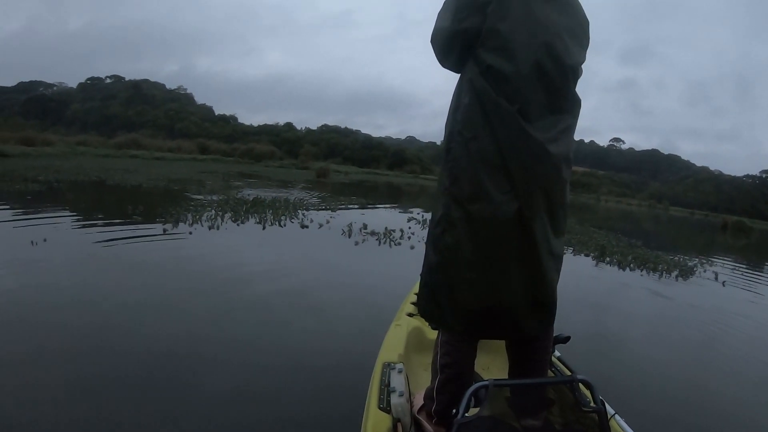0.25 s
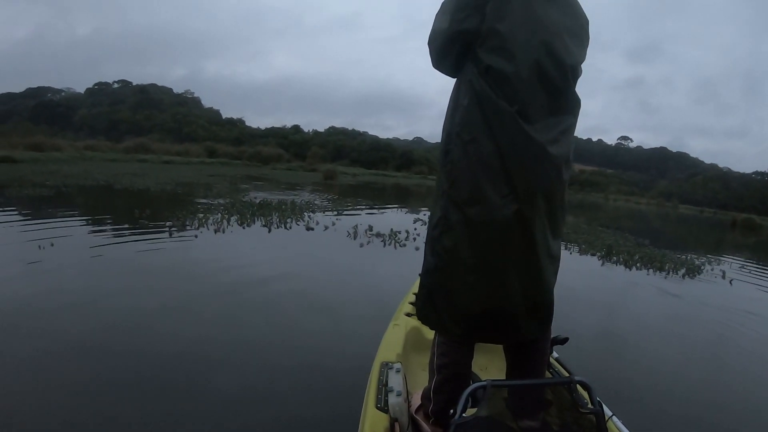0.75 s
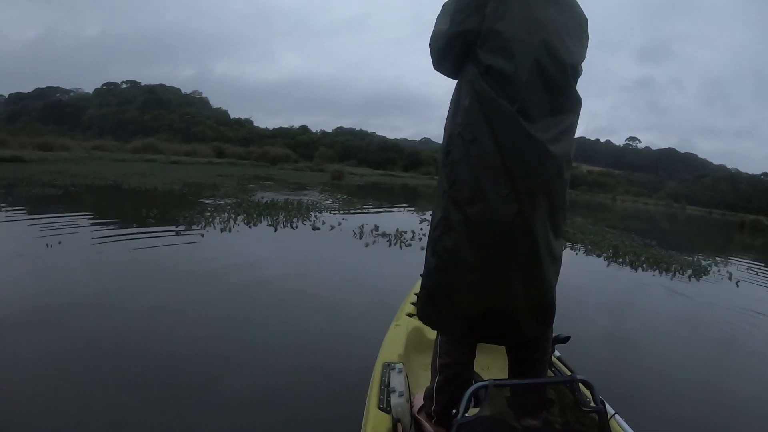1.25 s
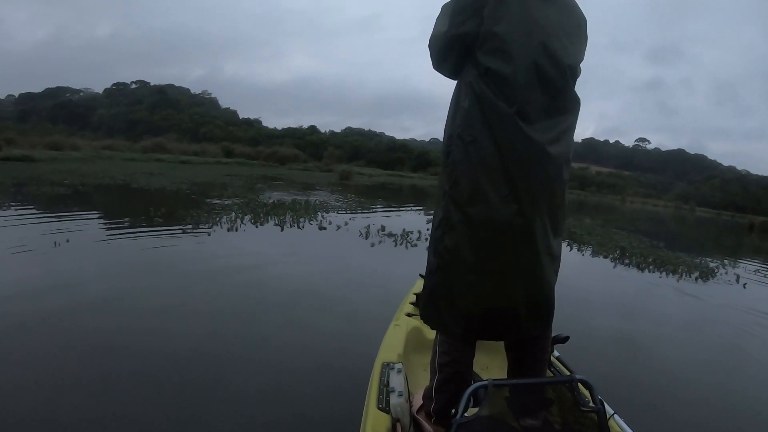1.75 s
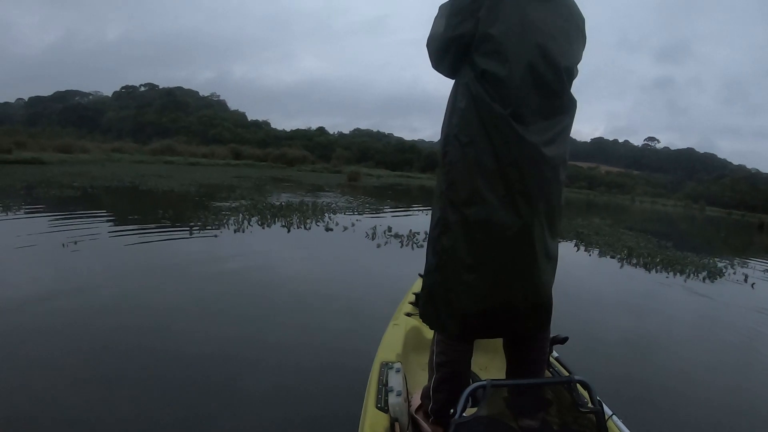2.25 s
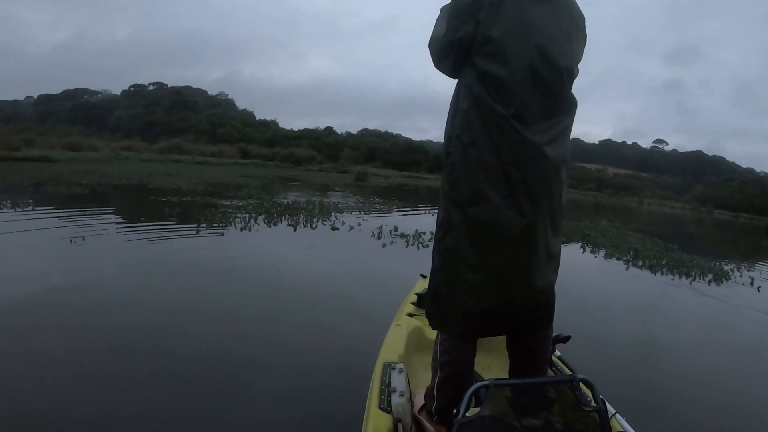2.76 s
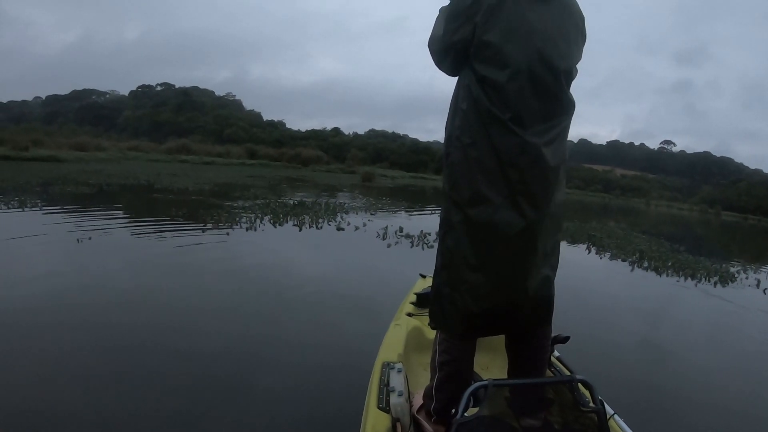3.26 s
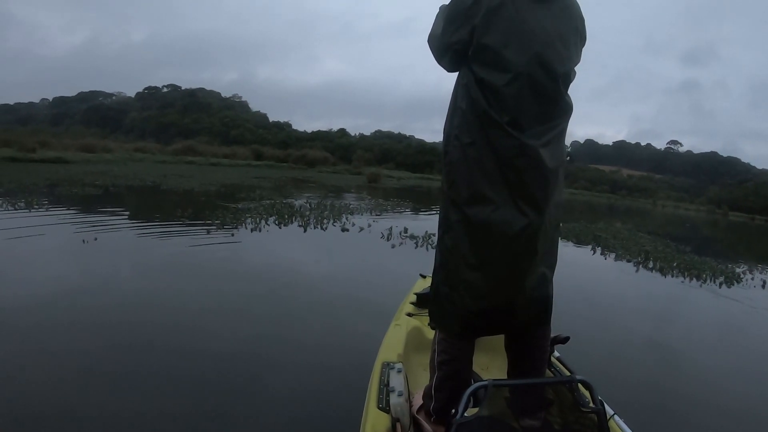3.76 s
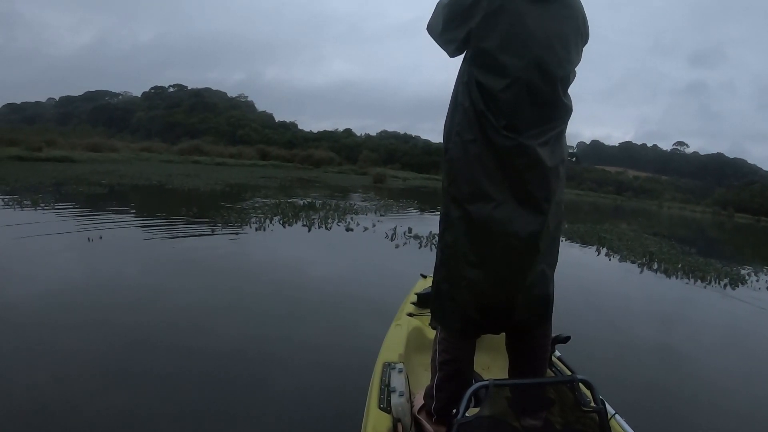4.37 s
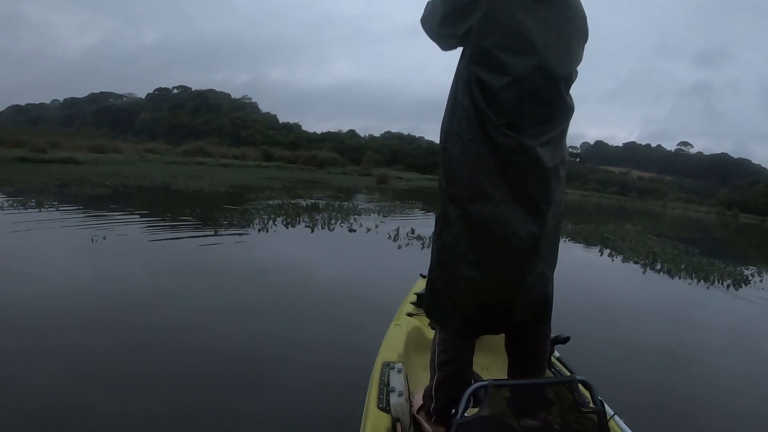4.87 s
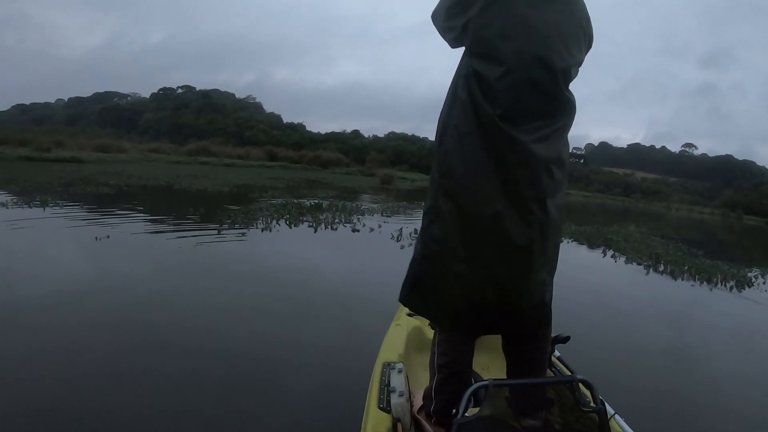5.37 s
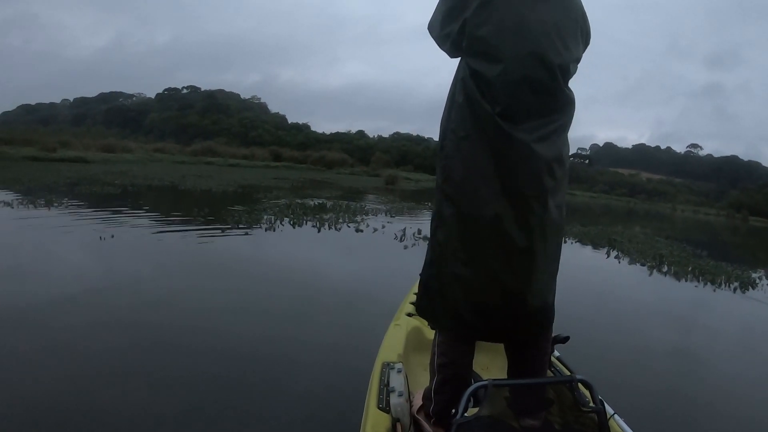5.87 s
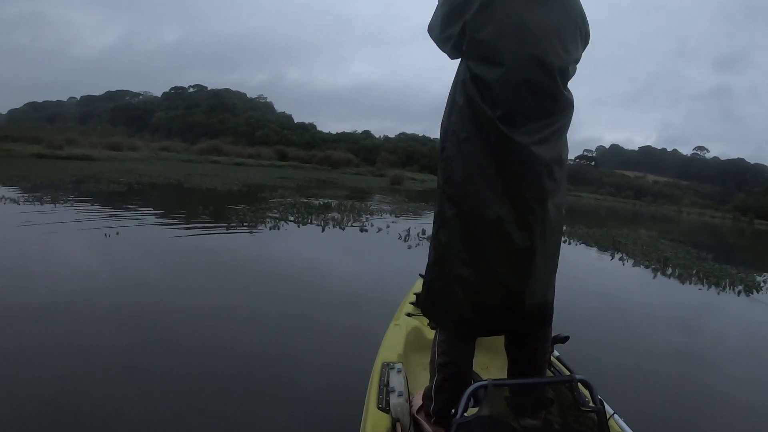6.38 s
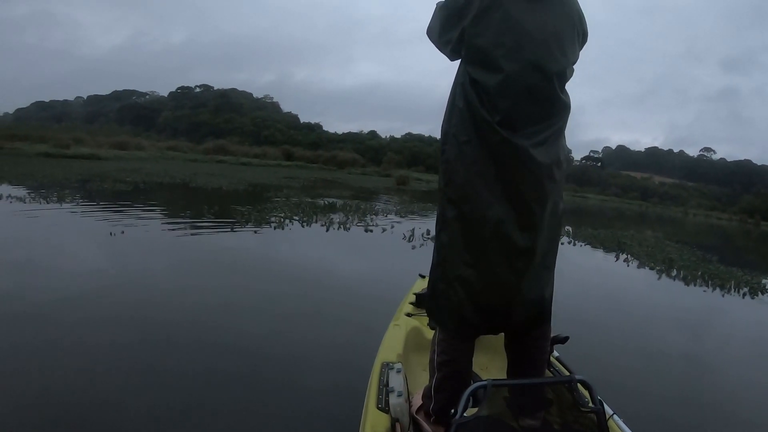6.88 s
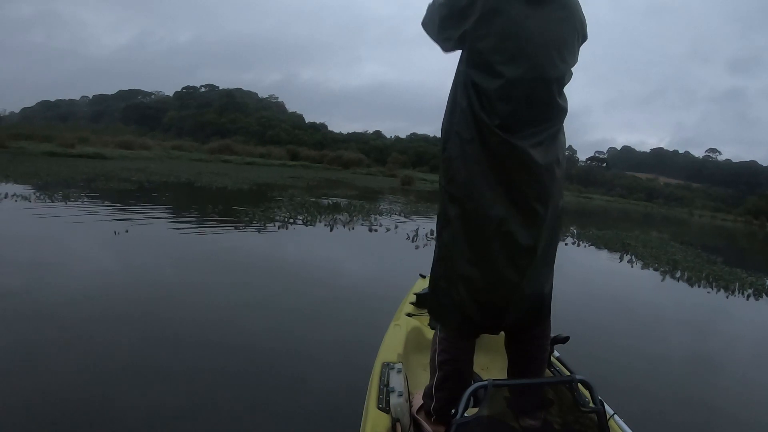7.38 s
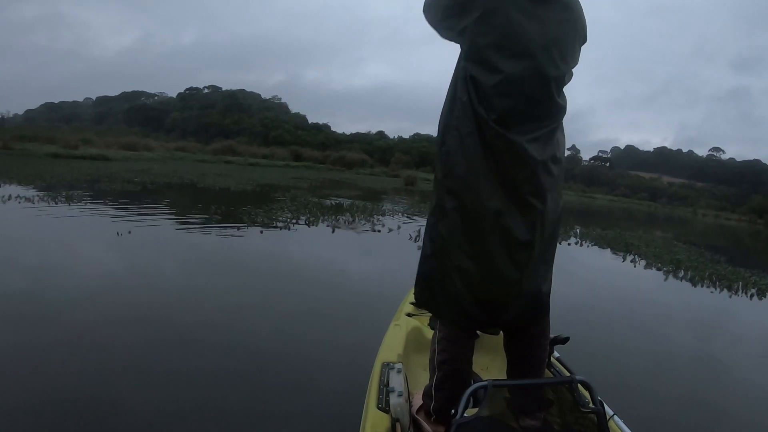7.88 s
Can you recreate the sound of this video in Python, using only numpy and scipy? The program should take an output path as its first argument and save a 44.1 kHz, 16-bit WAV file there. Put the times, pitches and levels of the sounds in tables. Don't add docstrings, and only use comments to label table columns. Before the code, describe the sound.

Many birds chirp and slur from both banks as bursts of fish splashing break out beside a kayak, over a soft low hum.

```python
import sys
import numpy as np
from scipy import signal
from scipy.fft import rfft, irfft
from scipy.io import wavfile
from scipy.ndimage import uniform_filter1d

SR = 44100
rng = np.random.default_rng(int(sys.argv[2]) if len(sys.argv) > 2 else 0)


def field_ratio(decibels):
    return 10 ** (np.asarray(decibels, dtype=float) / 20)


def store_wav(level_fs):
    pcm = np.round(np.clip(np.atleast_2d(level_fs), -1, 1) * 32767)
    wavfile.write(sys.argv[1], SR, pcm.T.astype(np.int16))


N = 358533


def rms_one(x):
    return x / np.sqrt(np.mean(x ** 2) + 1e-20)


def at_hz(points, hz):
    points = np.array(points)
    return np.interp(np.log(hz), np.log(points[:, 0]), points[:, 1])


def drift(rate):
    return np.interp(np.arange(N) * rate / SR, np.arange(3000), rng.standard_normal(3000))


def colour(x, spectrum):
    hz = np.fft.rfftfreq(N + 1, 1 / SR) + 1
    inside = (hz > spectrum[0][0]) & (hz < spectrum[-1][0])
    gain = field_ratio(at_hz(spectrum, hz)) * inside
    return irfft(rfft(x, N + 1) * gain, N + 1)[..., :N]


def spread(mid, side):
    # (frequency [Hz], likeness [0 to 1])
    likeness = [(30, .3), (70, 0.3), (160, 0.75), (300, 0.35), (1050, 0.65), (2730, 0.65), (7100, 0.15)]
    hz = np.fft.rfftfreq(N + 1, 1 / SR) + 1
    alike = np.clip(at_hz(likeness, hz), .1, 1)
    common = rfft(mid, N + 1) * np.sqrt(1 + alike)
    opposed = rfft(side, N + 1) * np.sqrt(1 - alike)
    return irfft(np.array([common + opposed, common - opposed]), N + 1)[:, :N] / np.sqrt(2)


def add(out, start, hz, height):
    i = int(start * SR)
    tone = height * np.sin(2 * np.pi * np.cumsum(hz) / SR)
    tone = tone[max(-i, 0):max(N - i, 0)]
    out[max(i, 0):max(i, 0) + len(tone)] += tone


def notes(rows, edge):
    out = np.zeros(N)
    for start, length, first, middle, last, level_db in rows:
        u = np.linspace(0, 1, int(length * SR))
        bend = np.polyfit([0, .5, 1], np.log([first, middle, last]), 2)
        swell = np.sin(np.pi * u) ** edge
        add(out, start, np.exp(np.polyval(bend, u)), np.sqrt(2) * field_ratio(level_db) * swell)
    return out


def glides(rows, bend):
    return [(s, length, a, a * (b / a) ** bend, b, level_db) for s, length, a, b, level_db in rows]


def songs(phrases):
    out = np.zeros(N)
    for phrase in phrases:
        s, hz, level_db = np.transpose(phrase)
        t = np.arange(s[0], s[-1], 1 / SR)
        pitch = uniform_filter1d(np.interp(t, s, np.log(hz)), size=900, mode="nearest")
        ends = np.clip(np.minimum(t - s[0] + .001, s[-1] - t) / 0.0027, 0, 1)
        add(out, s[0], np.exp(pitch), np.sqrt(2) * field_ratio(np.interp(t, s, level_db)) * ends)
    return out


def banks(x, t60):
    t = np.arange(SR // 2) / SR
    tails = rng.standard_normal((2, len(t))) * field_ratio(-60 * t / t60) * (t > .004)
    tails = tails / np.sqrt(np.sum(tails ** 2, axis=1, keepdims=True))
    return signal.fftconvolve(x[None], tails, axes=1)[:, :N]


def bubble(rows, cycles, rise):
    out = np.zeros(N)
    for start, peak_db, hz in rows:
        u = np.linspace(0, 1, int(cycles / hz * SR))
        swell = (5 * u * np.exp(1 - 5 * u)) ** 2
        add(out, start, hz * (1 - rise / 4 + rise * u), field_ratio(peak_db) * swell)
    return out


def lead_singer():
    # (time into the syllable [s], pitch [Hz], level [dB])
    syllables = [
        [(0, 3560, -14.5), (.02, 3680, -7), (.09, 3760, -6), (.11, 3730, -16)],
        [(0, 3200, -16.5), (.03, 3710, -3), (.08, 4110, -1.5), (.155, 4350, -2), (.175, 4330, -18.5)],
        [(.012, 5800, -24), (.02, 5560, -6), (.058, 4790, 1), (.12, 3620, -3), (.17, 3220, -10),
         (.26, 2900, -14)],
        [(0, 6860, -20), (.046, 5100, -0.5), (.085, 4150, 1), (.124, 3600, -5), (.17, 3230, -14),
         (.25, 2940, -20)],
    ]
    # (start of each syllable in order [s] .., level [dB])
    sung = [
        (0.444, .71, 0.96, 1.363, -42),
        (2.415, 2.668, 2.885, -52),
        (5.536, 5.815, 6.066, 6.463, -41),
        (7.76, 8.0, -52),
    ]
    phrases = []
    for *starts, level_db in sung:
        for s, syllable in zip(starts, syllables):
            phrases.append(np.add(syllable, [s, 0, level_db]))
    return songs(phrases)


def slurring_birds():
    # (time [s], length [s], first [Hz], last [Hz], level [dB])
    falls = [(.579, 0.19, 3245, 2137, -53.5), (.593, .11, 2680, 2060, -55.5),
             (.808, .05, 3700, 2375, -54.5), (1.285, .135, 2480, 2050, -52),
             (1.417, .052, 3680, 3420, -52.5), (2.885, 0.225, 3330, 2050, -52.5),
             (3.665, .08, 2650, 2250, -57), (3.7, .11, 5150, 3530, -55.5), (4.495, .1, 4550, 3000, -60),
             (5.13, .25, 3430, 2580, -55), (6.235, .13, 4990, 3040, -56.5), (6.75, .12, 5900, 3800, -57),
             (7.54, 0.2, 5810, 3050, -59), (7.565, 0.047, 3800, 3370, -51)]
    droops = [
        (1.742, .055, 3450, 2250, -57.5),
        (1.77, .145, 3750, 2200, -56.5),
        (4.224, .11, 3580, 2300, -59),
        (7.465, .076, 3600, 2750, -57),
        (1.177, .115, 3790, 2450, -51),
    ]
    dives = [
        (.786, .085, 7900, 5350, -67),
        (3.011, .075, 6900, 5300, -63),
        (5.31, .09, 7900, 5400, -67),
        (4.67, .075, 6550, 5700, -63),
        (.71, .05, 7000, 5300, -65),
    ]
    climbs = [(.86, .07, 2700, 3440, -58.5), (3.215, .075, 2500, 3400, -57), (3.51, .07, 3150, 3610, -54),
              (4.915, .045, 3800, 4300, -58.5), (5.25, .055, 3100, 3880, -54),
              (6.627, .08, 3740, 4270, -58.5), (4.047, .09, 4930, 5450, -64.5)]
    catches = [.627, .712, 2.94, 2.998, 3.058, 5.208, 5.247]
    catch_s, catch_depth = .008, .95
    rows = glides(falls, .62) + glides(droops, .4) + glides(dives, .8) + glides(climbs, .75)
    t = np.arange(N) / SR
    caught = sum(np.exp(-((t - s) / catch_s) ** 2) for s in catches)
    return notes(rows, edge=0.23) * (1 - catch_depth * caught)


def chatterer():
    # (time [s], length [s], foot [Hz], top [Hz], level [dB])
    arches = [(4.455, .078, 2250, 2880, -56), (4.743, .088, 2350, 3080, -46),
              (4.862, .035, 2950, 3550, -55), (7.614, .04, 2310, 2750, -49),
              (7.655, 0.049, 2294, 2800, -48.5), (8.0, 0.06, 2050, 2600, -45), (.19, .07, 2350, 2800, -59)]
    # (time [s], length [s], first [Hz], last [Hz], level [dB])
    strokes = [(4.652, .036, 2450, 3800, -53), (4.687, .018, 3800, 2700, -54),
               (4.83, .055, 2900, 2420, -49), (4.888, .062, 2850, 2380, -45), (4.955, .04, 2350, 2750, -49),
               (4.995, .042, 2650, 2320, -52), (4.54, .04, 2600, 2200, -58), (4.685, .025, 2300, 2500, -53),
               (7.755, .085, 2680, 2250, -46), (7.732, .028, 2250, 2700, -48)]
    rows = [(s, length, foot, top, foot, level_db) for s, length, foot, top, level_db in arches]
    return notes(rows + glides(strokes, .55), edge=0.22)


def trill():
    starts = [4.262, 4.345, 4.437, 4.52, 4.6, 4.76, 4.83, 4.895, 4.955, 5.01]
    # (length [s], first [Hz], middle [Hz], last [Hz], level [dB])
    length, first, middle, last, level_db = (.032, 6200, 6500, 6720, -61)
    sag_per_s = .09
    rows = []
    for s in starts:
        sag = sag_per_s * (s - starts[0])
        rows.append((s, length, first, middle * (1 - sag / 2), last * (1 - sag), level_db))
    return notes(rows, edge=0.18)


def right_bank_songs():
    # (time [s], pitch [Hz], level [dB])
    phrases = [
        [(0, 2860, -45), (0.07, 2400, -50), (0.138, 2050, -57)],
        [(0.075, 7600, -74), (0.125, 6000, -64), (0.18, 4700, -64)],
        [(0.2, 4850, -64), (0.25, 3950, -57), (0.31, 3400, -57), (0.41, 3430, -58), (0.45, 3550, -60)],
        [(3.275, 7600, -69), (3.345, 5700, -60), (3.4, 4550, -58), (3.45, 3800, -57), (3.495, 3300, -58)],
        [(6.298, 5240, -66), (6.34, 6050, -60), (6.4, 6250, -62), (6.477, 6100, -63)],
        [(6.89, 3280, -60), (6.94, 3950, -57), (6.985, 4280, -56), (7.02, 3850, -61)],
        [(7.12, 5520, -62), (7.15, 5620, -58), (7.2, 5350, -58), (7.254, 4680, -55), (7.329, 3430, -57),
         (7.375, 3400, -54)],
    ]
    return songs(phrases)


def chips():
    # (time [s], length [s], top [Hz], level [dB])
    calls = [(1.356, .04, 5770, -57), (1.697, .13, 6090, -59), (1.838, .038, 6250, -57.5),
             (1.89, .06, 5950, -60), (1.3, .04, 5750, -60), (2.285, .035, 6250, -58),
             (2.49, .045, 7000, -62), (2.71, .08, 7150, -63), (6.92, .04, 5900, -59), (7.0, .03, 5450, -59),
             (7.265, .03, 6200, -59), (2.154, .1, 6540, -56), (2.596, .045, 6320, -58),
             (4.139, 0.05, 5610, -58), (4.21, .04, 5700, -58), (5.787, .1, 5460, -58),
             (5.898, .05, 5704, -55), (5.956, .04, 5860, -57.5), (6.726, .11, 6750, -61),
             (6.866, .038, 6150, -57), (7.059, .03, 5450, -58.5), (7.09, .05, 6850, -63),
             (7.191, .08, 6270, -61.5), (7.311, .055, 7030, -61.5), (7.896, .075, 5250, -60.5),
             (7.985, .04, 5850, -62), (8.044, .04, 5660, -64.5)]
    leap, leap_s, sag_per_s = .16, .011, .25
    out = np.zeros(N)
    for s, length, top, level_db in calls:
        t = np.arange(int(length * SR)) / SR
        hz = top * (1 - leap * np.exp(-t / leap_s) - sag_per_s * t)
        add(out, s, hz, field_ratio(level_db + 3.5) * np.sin(np.pi * t / length) ** 0.23)
    return out


def distant_birds():
    # (time [s], length [s], first [Hz], last [Hz], level [dB])
    far_slides = [(.25, .108, 7500, 4650, -65), (.348, .032, 5750, 5550, -62), (.62, .045, 5850, 5600, -63),
                  (.65, .028, 5000, 5050, -62), (.738, .065, 5200, 5000, -58), (1.1, .12, 5650, 5900, -64),
                  (1.195, .06, 4900, 5600, -62), (1.22, .05, 6050, 5600, -64), (1.29, .045, 5000, 4850, -57),
                  (1.31, .048, 2900, 3950, -55), (1.355, .035, 3250, 2800, -57), (1.535, .075, 5300, 3400, -62),
                  (1.85, .065, 4550, 2950, -59), (2.015, .03, 4350, 4400, -55), (2.045, .025, 6800, 5000, -63),
                  (2.625, .018, 3200, 4200, -53), (2.968, .07, 3520, 3430, -54), (3.25, .075, 5350, 4350, -63),
                  (3.32, .03, 7050, 5700, -63), (3.805, .04, 6750, 6700, -61), (3.955, .065, 7300, 5500, -66),
                  (4.225, .062, 5050, 4950, -60), (4.33, .065, 7500, 7200, -68), (4.775, .07, 4150, 3050, -58),
                  (5.075, .035, 6850, 5950, -59), (5.26, .025, 7100, 5500, -62),
                  (5.575, .045, 3000, 3600, -58), (5.615, .12, 5950, 6900, -63), (5.965, .07, 4950, 4850, -56),
            (6.0, .065, 2850, 3050, -58), (6.195, .045, 4300, 5250, -59), (6.25, .06, 3050, 2850, -57),
            (6.7, .038, 3800, 4400, -55), (6.99, .06, 3050, 2500, -57), (7.05, .04, 2600, 3300, -60),
            (7.2, .06, 2700, 3800, -56), (7.75, .06, 3400, 3900, -58), (7.785, .068, 3300, 3720, -57),
            (7.79, .04, 5800, 5550, -60), (7.83, .04, 5650, 6250, -61), (7.44, .04, 3900, 4000, -56),]
    return notes(glides(far_slides, .55), edge=0.3) * field_ratio(3.5 * drift(110) - .4)


def birds():
    husk = .72 + .6 * drift(320)
    flutter = drift(55)
    left = lead_singer() * field_ratio(1.5 * flutter) + slurring_birds() * field_ratio(3.3 + 1.8 * flutter)
    left = left + chatterer() * husk * field_ratio(1.5)
    right = (right_bank_songs() + chips()) * field_ratio(3.0 * drift(60)) + trill() * husk
    distant = distant_birds()
    left_db = 2.2 - .33 * np.arange(N) / SR
    near = left * field_ratio(np.outer([1, -1], left_db)) + right * field_ratio([[-2.6], [2.2]])
    echoes = field_ratio(-8.5) * banks(left + right + distant, t60=0.21)
    return near + echoes + distant * field_ratio(np.outer([1, -1], 3.0 * drift(4)))


def surges(fade, spray=False):
    # (time [s], hold [s], churned water level [dB], spray level [dB])
    thrashes = [(1.279, .3, -57, -90), (1.606, .12, -55, -85), (1.778, .08, -59, -78),
                (1.965, 0.11, -54.5, -75), (2.087, 0.094, -49.5, -67.5), (2.223, .14, -53, -72.5),
                (2.517, 0.088, -51, -69.5), (2.641, .06, -51, -67.5), (2.76, .13, -55, -81),
                (3.478, 0.04, -50.5, -66), (3.575, .1, -53.5, -70), (3.741, 0.16, -50, -74.5),
                (4.0, .06, -59, -76.5), (4.167, .06, -55.5, -75), (4.297, 0.068, -58.5, -85),
                (4.44, .22, -66, -72), (5.567, 0.22, -59, -79), (5.918, .06, -54.5, -76),
                (6.098, .15, -58, -83), (6.301, .1, -56.5, -80), (6.45, .06, -52, -70.5),
                (6.56, 0.053, -52.5, -77), (6.717, .08, -59, -81), (6.828, .08, -55.5, -69.5),
                (6.964, .04, -61, -80), (7.36, .14, -63, -75), (7.601, .1, -52.5, -77),
                (7.784, .14, -58, -75.5)]
    s, hold, churn_db, spray_db = np.transpose(thrashes)[:, :, None]
    if spray:
        hold = hold * .6
    level_db = spray_db if spray else churn_db
    t = np.arange(0, N, 32) / SR
    rise_db = 450 * np.maximum(s - t, 0)
    fade_db = fade * np.maximum(t - s - hold, 0)
    power = np.sum(field_ratio(level_db - rise_db - fade_db) ** 2, axis=0)
    return np.interp(np.arange(N) / SR, t, np.sqrt(power))


def small_bubbles():
    d = rng.random((2200, 3))
    level_db = -24 * d[:, 1] - 12 * (1 - d[:, 2]) ** 2
    return bubble(np.column_stack([d[:, 0] * N / SR, level_db, 540 * 7.5 ** d[:, 2]]), cycles=9, rise=.5)


def splash():
    # (frequency [Hz], density [dB per Hz])
    churn = [(250, -15), (450, -22.5), (800, -5), (1500, 3.5), (2500, -4), (4000, -2), (7000, -25.5)]
    # (frequency [Hz], density [dB per Hz])
    spray = [(2500, -20), (4500, -17), (7000, -15), (8300, -32), (9300, -24.5), (11500, -43), (14000, -58),
             (15500, -76)]
    small = np.array([small_bubbles(), small_bubbles()])
    lumps = field_ratio(4.3 * drift(35) + 2.2 * drift(140))
    foam = rms_one(colour(rng.standard_normal((2, N)), churn) * lumps)
    water = spread(*(foam + field_ratio(-2.0) * rms_one(small))) * surges(fade=169) * field_ratio(0.5)
    drops = rng.standard_normal((2, N)) * field_ratio(2.6 * rng.exponential(1, N).clip(0, 5))
    drops = drops * (rng.random(N) < .2)
    mist = rms_one(spread(*colour(drops, spray))) * np.sqrt(lumps)
    return water * field_ratio([[.5], [-.5]]) + field_ratio(16.8) * surges(fade=150, spray=True) * mist


def tail_blows():
    # (time [s], peak level [dB], frequency [Hz])
    blows = np.array([(1.651, -38, 700), (1.665, -34.5, 965), (1.7, -39, 1560), (2.106, -31.5, 752),
                      (2.547, -34, 1505), (2.583, -35, 1110), (2.642, -25.5, 1280), (3.491, -31.5, 2240),
                      (3.491, -26, 1350), (3.528, -39, 760), (3.626, -32.5, 723), (3.745, -21.5, 2330),
                      (3.748, -26, 1600), (3.855, -35.5, 1310), (3.883, -29, 1570), (3.906, -35, 770),
                      (4.034, -40.5, 1600), (5.589, -32, 2560), (6.141, -38.5, 2450), (6.224, -37.5, 1300),
                      (6.443, -37.5, 960), (6.977, -38, 2640), (7.618, -24.5, 2380), (7.623, -37.5, 2750),
                      (7.813, -36.5, 2330)])
    # (time [s], peak level [dB])
    ticks = np.array([(2.0346, -39), (2.2754, -36), (2.6803, -33), (3.4803, -31), (3.8078, -34),
                      (4.1946, -35), (7.343, -31), (7.608, -31), (5.737, -40), (6.241, -36)])
    after = []
    for _ in range(5):
        d = rng.random((len(blows), 3))
        later = np.column_stack([0.003 + .016 * d[:, 0], -10 - 13.0 * d[:, 1], 750 * 4.1 ** d[:, 2]])
        after.append(blows * [1, 1, 0] + later)
    pockets = field_ratio(-2.5) * bubble(np.vstack([blows, *after]), cycles=12.0, rise=0.2)
    clicks = np.zeros(N)
    clicks[(blows[:, 0] * SR).astype(int)] = field_ratio(blows[:, 1] - 9.5)
    clicks[(ticks[:, 0] * SR).astype(int)] = field_ratio(ticks[:, 1] + 3.5)
    fading = signal.lfilter([1], [1, -np.exp(-1 / (0.0042 * SR))], clicks)
    band = signal.butter(4, [1100, 4800], "band", fs=SR, output="sos")
    return pockets + signal.sosfilt(band, fading * rng.standard_normal(N))


def lone_bubbles():
    # (time [s], peak level [dB], frequency [Hz])
    blips = [(1.294, -44, 1020), (1.416, -41, 1540), (1.454, -42, 657), (1.609, -40, 1250),
             (1.946, -42, 751), (2.023, -40, 1640), (2.337, -40, 1050), (2.597, -36, 834),
             (2.692, -40, 1010), (3.641, -34, 1000), (3.751, -29, 856), (4.217, -41, 1280),
             (5.59, -40, 837), (5.611, -42, 832), (5.952, -40, 1600), (5.989, -41, 764), (6.601, -38, 1710),
             (6.99, -40, 1520), (7.625, -36, 1390)]
    drips = [(2.834, -33, 4520), (3.1887, -38, 3720), (6.3145, -35, 2960), (6.4028, -34, 3430),
             (6.4842, -36, 2570), (6.8374, -35, 4390), (6.8957, -35, 3390), (7.3427, -26, 3500),
             (7.5068, -31, 3160), (7.7094, -39, 2380)]
    return field_ratio(-2.5) * bubble(blips, cycles=11.0, rise=0.25) + field_ratio(-0.5) * bubble(drips, cycles=16.0, rise=0.15)


def plops():
    # (time [s], length [s], first [Hz], last [Hz], level [dB])
    cavities = [(2.65, 0.014, 293, 415, -51), (3.62, 0.02, 286, 600, -54.5), (3.752, 0.018, 430, 600, -48),
                (3.805, 0.028, 240, 290, -46.5), (3.905, .05, 290, 240, -56), (2.34, .02, 250, 480, -57),
                (2.03, .018, 400, 520, -55), (1.54, .02, 420, 520, -57), (4.235, 0.064, 158, 348, -45),
                (7.628, .03, 695, 840, -48.5), (7.61, 0.017, 294, 348, -53), (7.895, 0.055, 155, 602, -51)]
    return notes(glides(cavities, 0.51), edge=0.29)


def slaps():
    out = tail_blows() + lone_bubbles() + plops()
    return out * field_ratio([[.7], [-.7]]) + field_ratio(-14) * banks(out, t60=0.042)


def sparks():
    # (time [s], peak level [dB])
    droplets = np.array([(2.1251, -54), (2.2498, -64), (2.6778, -52), (3.5069, -47), (3.7125, -60),
                         (3.8087, -60), (3.8866, -60), (4.0462, -60), (5.5902, -61), (6.5056, -57),
                         (6.8359, -57), (7.9074, -59)])
    clicks = np.zeros(N)
    clicks[(droplets[:, 0] * SR).astype(int)] = field_ratio(droplets[:, 1] + 4.0)
    fading = signal.lfilter([1], [1, -np.exp(-1 / (0.0015 * SR))], clicks + 1e-18)
    band = signal.butter(3, [6000, 11300], "band", fs=SR, output="sos")
    return spread(*signal.sosfilt(band, fading * rng.standard_normal((2, N))))


def dove_and_boom():
    # (time [s], length [s], first [Hz], last [Hz], level [dB])
    tones = [
        (.5, 0.87, 415, 431, -72.5),
        (3.35, 1.36, 183, 188.3, -60.5),
        (4.55, 0.38, 187.4, 185.7, -59),
        (5.2, 0.68, 426, 424, -76),
    ]
    return notes(glides(tones, .5), edge=0.61) * field_ratio(2.7 * drift(14))


def thuds_and_gusts():
    # (time [s], length [s], frequency [Hz], level [dB])
    low_pulses = [
        (3.02, .077, 64, -54),
        (4.1, .1, 45, -62),
        (7.09, .035, 70, -63),
        (7.185, .05, 67, -63),
        (7.305, .07, 48, -63),
        (7.705, .045, 34, -63),
        (8.095, .04, 55, -62),
    ]
    rows = [(s, length, hz, hz, hz, level_db) for s, length, hz, level_db in low_pulses]
    return notes(rows, edge=.4) * field_ratio([[-5], [2.5]])


def far_chorus():
    # (frequency [Hz], density [dB per Hz])
    chorus = [(590, -56), (1000, -22), (1240, -15.5), (2000, 0), (2560, -1), (3470, -2), (3810, 4.5),
              (4110, -4), (4470, 3), (4860, -21), (5810, -8), (7550, -25.5), (9820, -60), (16600, -120)]
    when, size, pitch, fall, faint = rng.random((1100, 5)).T
    first = 2200 * 3.6 ** pitch ** .7
    last = first * np.exp(-.5 * fall + .17)
    middle = (1.04 - 0.0801 * fall) * np.sqrt(first * last)
    level_db = -7 * faint - 5 * size + .8 * at_hz(chorus, first)
    rows = np.column_stack([when * N / SR, 0.012 + 0.045 * size ** 2, first, middle, last, level_db])
    slides = rms_one(notes(rows, edge=0.66))
    hiss = rms_one(spread(*colour(rng.standard_normal((2, N)), chorus)))
    return field_ratio(-53.7) * (hiss * field_ratio(1.5 * drift(5.9)) + field_ratio(-6) * (slides + 1.06 * banks(slides, t60=0.13)))


def low_hum():
    # (frequency [Hz], density [dB per Hz])
    bands = [(13, -34), (27, -4), (75, -4), (113, -14), (159, 1.5), (257, -14), (380, -18), (467, -16.5),
             (544, -26.5), (715, -3.5), (848, -0.5), (989, -26.5), (1300, -16), (1690, -36.5), (2860, -120)]
    # (frequency [Hz], density [dB per Hz])
    top = [(7000, -8), (7600, -6.5), (8300, -13), (9300, -13), (10500, -13), (11500, -40.5), (13000, -37.5)]
    hum = rms_one(spread(*colour(rng.standard_normal((2, N)), bands)))
    wind = signal.sosfiltfilt(signal.butter(2, 105, fs=SR, output="sos"), hum)
    wind = wind * field_ratio(4.5 * drift(10) - 3) * field_ratio([[-8], [1.5]])
    rest = signal.sosfiltfilt(signal.butter(2, 105, "high", fs=SR, output="sos"), hum)
    rest = rest * field_ratio(2.8 * drift(25))
    air = rms_one(spread(*colour(rng.standard_normal((2, N)), top)))
    return field_ratio(-61) * (wind + rest) + field_ratio(-82.8 + 1.5 * drift(6)) * air


def scene():
    near = birds() + splash() + slaps() + sparks()
    return near + dove_and_boom() + thuds_and_gusts() + far_chorus() + low_hum()


def band_limit(x):
    return signal.sosfilt(signal.butter(12, 15500, fs=SR, output="sos"), x)


def record(dry):
    mix = .3 * np.tanh(dry / .3)
    return band_limit(mix)


dry = scene()
out = record(dry)
store_wav(out)
```